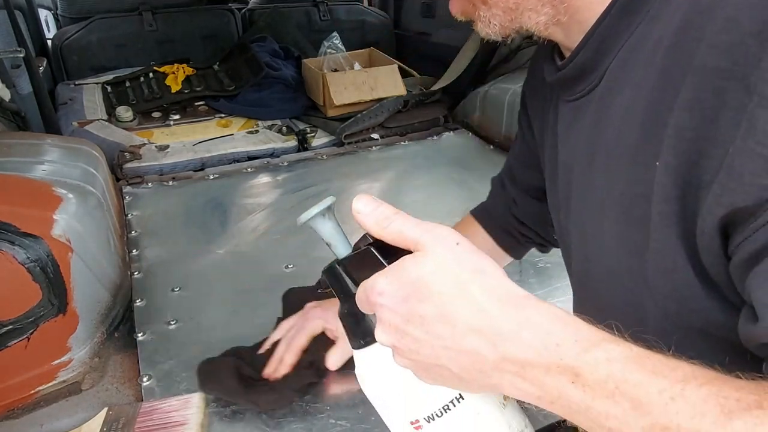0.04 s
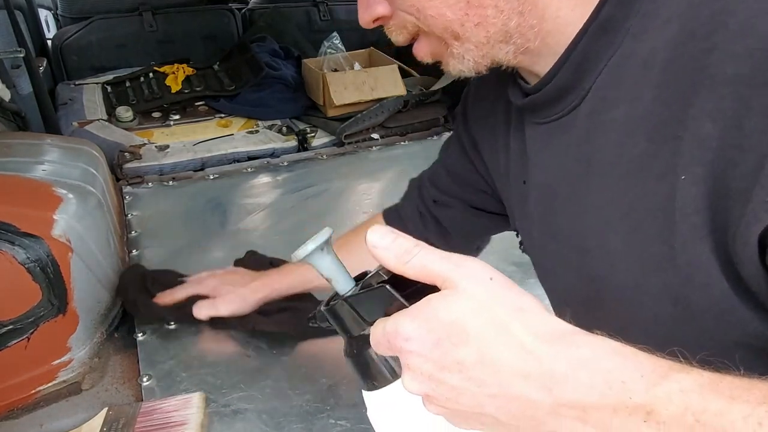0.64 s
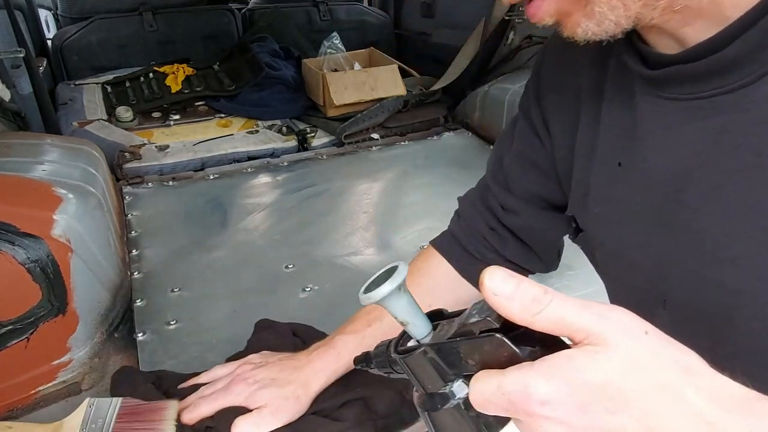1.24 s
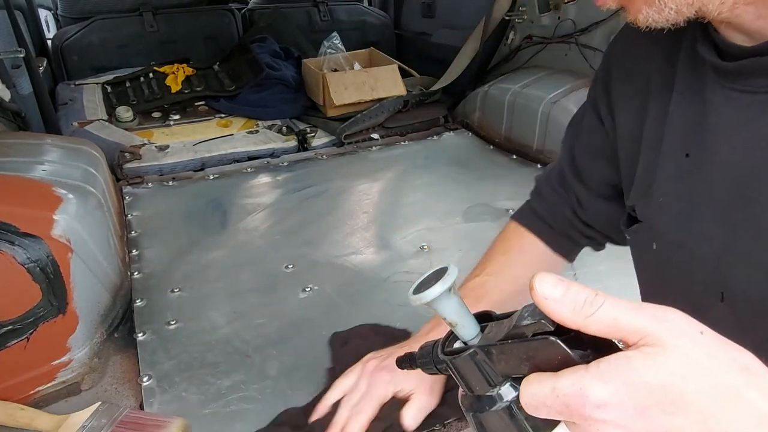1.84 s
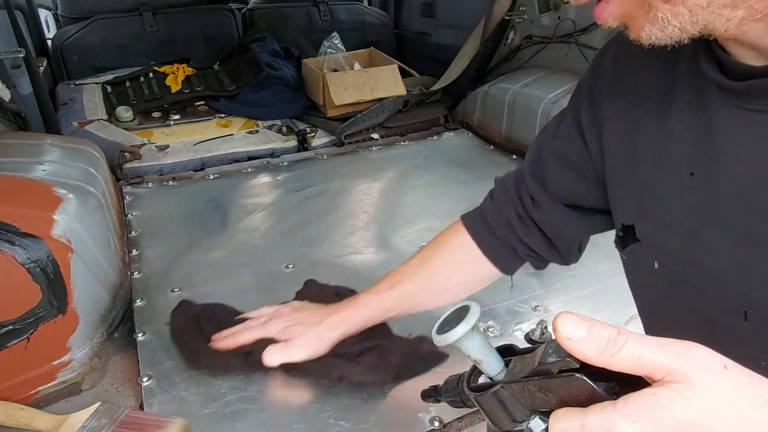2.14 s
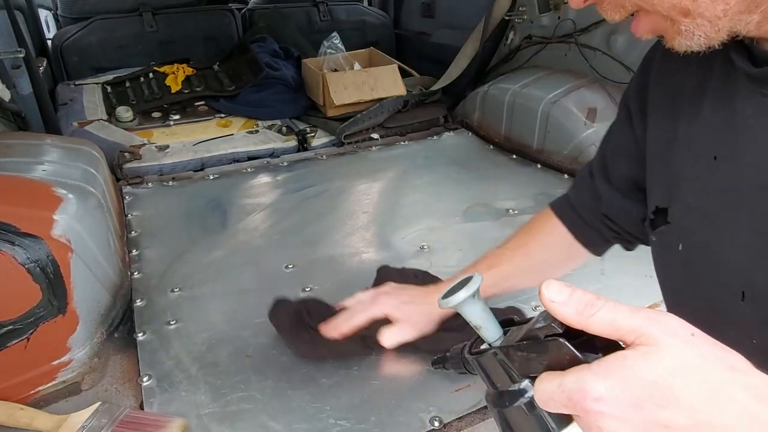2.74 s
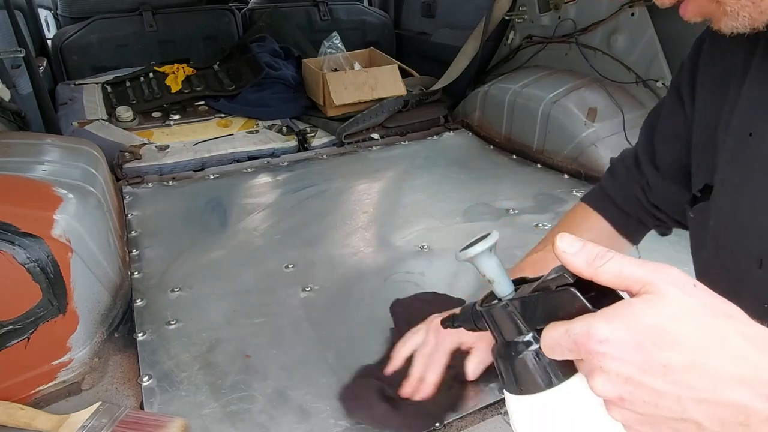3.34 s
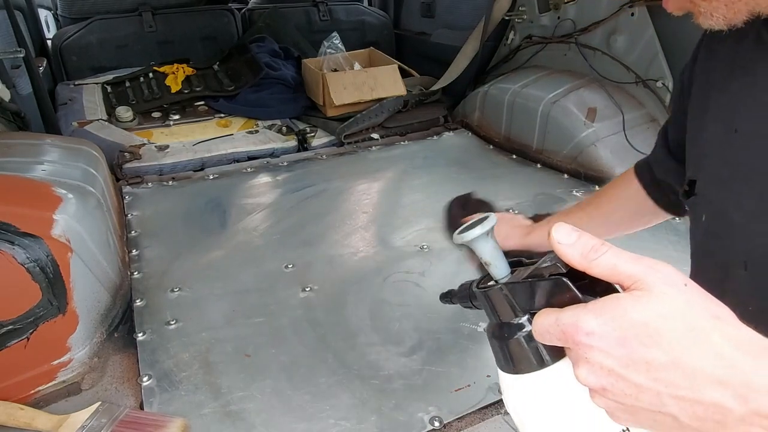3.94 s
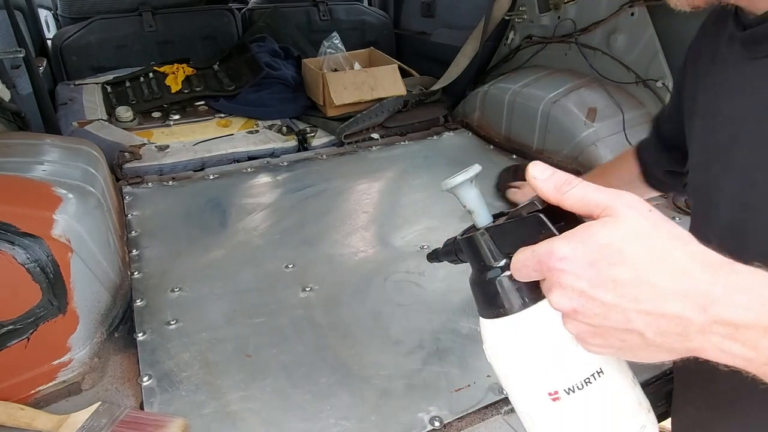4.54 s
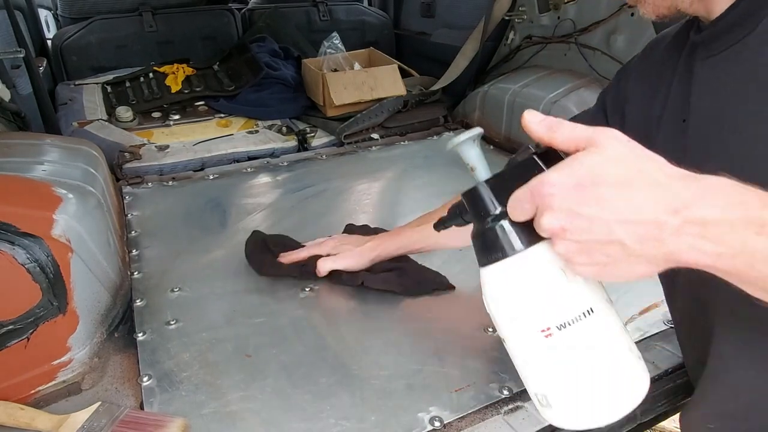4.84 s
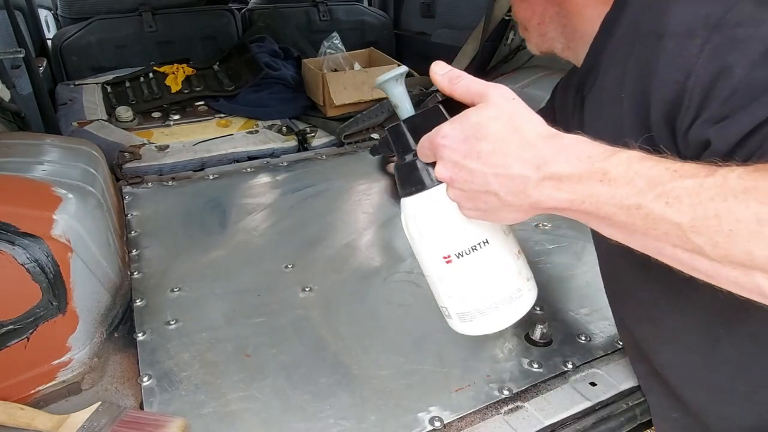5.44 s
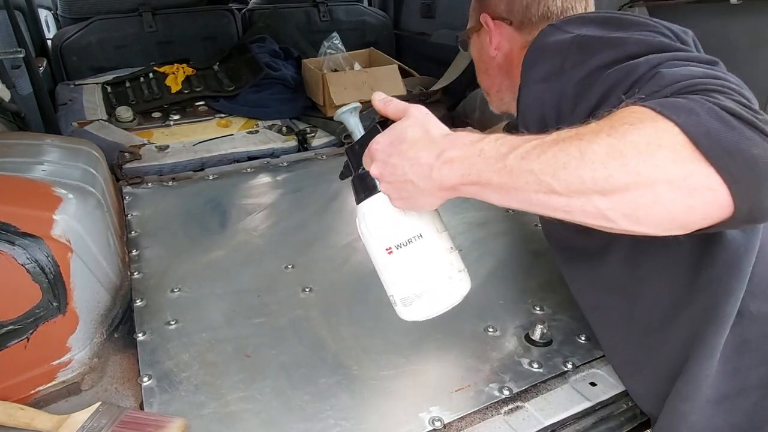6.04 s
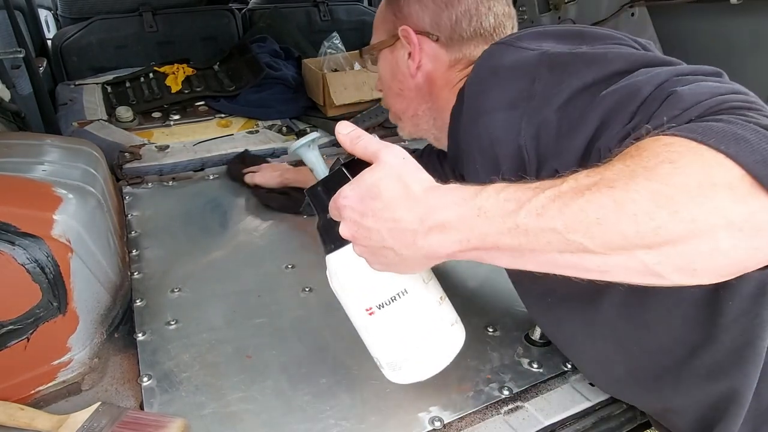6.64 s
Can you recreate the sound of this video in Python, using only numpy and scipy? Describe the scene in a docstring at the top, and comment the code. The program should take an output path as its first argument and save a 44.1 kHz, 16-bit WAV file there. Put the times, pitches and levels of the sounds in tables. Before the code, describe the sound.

Close up in a quiet workshop, quick, uneven cloth strokes swish across a metal sheet inside a car body. Early on come a few plastic clicks from a handled bottle and a brief bright rustle, followed by a cluster of ringing knocks as the sheet hits the floor below. The rubbing continues with low flexing thumps, joined later by sleeve rustles and light bottle ticks.

```python
"""A cloth wipes to and fro over a loose sheet-metal floor panel inside a stripped car body.
Its fibres hiss and scrub; the sheet rumbles, flexes under the hand and a few times knocks on the
floor below. The plastic pump bottle in the other hand ticks, with a brief bright rustle around the
early ticks. Later a sleeve rustles as the arm reaches out. Quiet workshop air lies underneath."""
import sys
import numpy as np
from scipy import signal
from scipy.fft import rfft, irfft, next_fast_len
from scipy.io import wavfile
from scipy.ndimage import uniform_filter1d

SR = 44100
rng = np.random.default_rng(int(sys.argv[2]) if len(sys.argv) > 2 else 0)


def generate_wav(sig):
    """Save sig (samples, or channels by samples) to the path in sys.argv[1] as 16-bit PCM at SR."""
    pcm = np.round(np.clip(np.atleast_2d(sig).T, -1, 1) * 32767).astype(np.int16)
    wavfile.write(sys.argv[1], SR, pcm)


N = 295014
T = np.arange(N) / SR
RING_SAMPLES = 20480
RING_T = np.arange(RING_SAMPLES) / SR


def undb(db):
    """Decibels to gain."""
    return 10 ** (np.asarray(db) / 20)


def unit(x):
    """Scale to rms 1."""
    return x / np.sqrt(np.mean(x ** 2))


def lookup(table, hz):
    """Read (freq_hz, value) points on a log-frequency axis."""
    freq_hz, value = np.transpose(table)
    return np.interp(np.log(hz + 1), np.log(freq_hz + 1), value)


def eq(x, curve):
    """Filter by (freq_hz, gain_db) points."""
    size = next_fast_len(x.shape[-1])
    gain = undb(lookup(curve, np.fft.rfftfreq(size, 1 / SR)))
    return irfft(rfft(x, size) * gain, size)[..., :x.shape[-1]]


def wander(rate_hz):
    """Smooth random modulation with rms 1."""
    size = max(int(SR / rate_hz), 1)
    steps = np.repeat(rng.standard_normal(N // size + 1), size)[:N]
    return unit(uniform_filter1d(uniform_filter1d(steps, size), size))


def add(out, start_s, sound):
    """Mix a stereo sound in at start_s."""
    i = max(int(start_s * SR), 0)
    out[:, i:i + sound.shape[1]] += sound[:, :max(N - i, 0)]


# Stereo width: freq_hz, side_minus_mid_db
STEREO_WIDTH = [(60, -2.5), (200, -9), (380, -10.5), (700, -5), (1300, -0.5), (2400, -2.5), (4400, 0.5),
                (15000, 0)]
# Stereo balance: freq_hz, left_minus_right_db
STEREO_BALANCE = [(100, 1.5), (1000, 1), (2400, 1), (4400, -0.5), (6500, -1.5), (8100, -4), (9500, 6),
                  (12000, 5), (15000, -1.5)]

def spread(pair):
    """Two unrelated noises to left and right: narrow in the low mids, wide in the treble."""
    mid, side = pair[0], eq(pair[1], STEREO_WIDTH)
    left = eq(mid + side, [(hz, db / 2) for hz, db in STEREO_BALANCE])
    right = eq(mid - side, [(hz, -db / 2) for hz, db in STEREO_BALANCE])
    return np.array([left, right])


def modes(table, scatter_db, lag_ms, wide_hz=1500):
    """Fading tones, weighted anew at each spot; the right ear lags, and highs arrive from all sides."""
    hz, db, t60 = np.transpose(table)[:, :, None]
    weight, phase, stray = rng.standard_normal((3, len(hz), 1))
    decay = np.log(1000) * RING_T / t60
    tones = undb(db + scatter_db * weight) * np.exp(2j * np.pi * (hz * RING_T + phase) - decay)
    right_phase = 2 * np.pi * hz * lag_ms / 1000 + stray * hz / wide_hz
    return np.array([tones.real.sum(0), (tones * np.exp(-1j * right_phase)).real.sum(0)])


def strike(ring, contact_ms, low_cut_hz, rise=6):
    """A longer contact gives a duller blow with a slower attack; the first 25 ms get rms 1."""
    contact_samples = SR * contact_ms / 1000
    attack = 1 - np.exp(-np.arange(RING_SAMPLES) / (contact_samples * rise))
    pole = np.exp(-1 / contact_samples)
    dulled = signal.lfilter([1], np.poly([pole, pole]), ring * attack)
    struck = signal.sosfilt(signal.butter(4, low_cut_hz, "high", fs=SR, output="sos"), dulled)
    return struck / np.sqrt(np.mean(struck[:, :1100] ** 2))


def fibres(curve, grain_db):
    """Countless tiny slips of cloth fibres, of uneven size."""
    slips = undb(grain_db * np.repeat(rng.standard_normal(N // 16 + 1), 16)[:N])
    return unit(eq(spread(rng.standard_normal((2, N)) * slips), curve))


# Bright hiss of the fibres: freq_hz, gain_db
HISS_EQ = [(1500, 3.5), (3500, -1), (5000, -3.5), (6500, -4), (8000, 2), (9000, -2), (10200, 0), (12000, 0),
           (13500, -2.5), (15800, -6.5)]
# Darker scrub of the pressed cloth: freq_hz, gain_db
SCRUB_EQ = [(150, 0), (350, 5), (600, 5), (900, 4.5), (1400, 0), (1900, 1.5), (2600, -4.5), (4500, -7.5),
            (7000, -8.5), (15000, -49)]
# Strokes, each lasting until the next. Some open with a brief dip, one just after the loudest knock.
# start_s, fastest_s, dip_s, hiss_db, scrub_db, rumble_db
CLOTH_STROKES = [(-0.2, 0.027, 0, -51, -53.5, -49), (0.15, 0.352, 0.005, -55, -54.5, -52),
                 (0.482, 0.696, 0, -49, -58, -52.5), (0.73, 0.97, 0, -48.5, -46, -46.5),
                 (1.029, 1.117, 0.019, -51, -44, -46), (1.289, 1.43, 0.039, -50.5, -47, -45.5),
                 (1.5, 1.613, .012, -51.5, -52.5, -49), (1.712, 1.804, 0.021, -51.5, -52.5, -45),
                 (1.953, 2.052, 0, -53, -51, -56), (2.144, 2.272, 0, -50.5, -48, -58.5),
                 (2.373, 2.527, 0.0072, -51.5, -51.5, -59), (2.65, 2.808, 0.018, -50.5, -50, -57),
                 (2.907, 3.02, 0.0013, -49, -57, -49.5), (3.113, 3.327, 0.011, -50, -49.5, -56.5),
                 (3.407, 3.676, 0.012, -51.5, -52.5, -52.5), (3.848, 4.036, 0.031, -51, -50.5, -52.5),
                 (4.184, 4.278, 0.0033, -55, -53.5, -54), (4.43, 4.87, 0.0054, -51.5, -59.5, -56.5),
                 (4.922, 4.987, 0.014, -52.5, -52.5, -58.5), (5.13, 5.2, 0, -52.5, -68, -59.5),
                 (5.329, 5.563, .01, -54.5, -67, -64.5), (5.685, 5.77, 0.006, -53.5, -63, -50.5),
                 (5.86, 5.956, 0, -52.5, -50, -52), (6.138, 6.21, .025, -53, -55.5, -60),
                 (6.297, 6.636, 0, -55, -60.5, -60)]

def cloth(hiss_trim_db=4.5, scrub_trim_db=2, rumble_trim_db=-1, flutter_db=1.32, judder_db=0.8):
    """Speed makes the fibres hiss; weight makes them scrub and sets the sheet rumbling."""
    hiss_db, scrub_db, rumble_db = np.transpose(CLOTH_STROKES)[3:]
    hiss = fibres(HISS_EQ, grain_db=1) * wiping(hiss_db, turn_db=-3.5, swell=2.04)
    hiss *= undb(hiss_trim_db + flutter_db * wander(45))
    scrub = fibres(SCRUB_EQ, grain_db=2.5)
    scrub *= wiping(scrub_db + scrub_trim_db, turn_db=-7, swell=2.5, dip=0.36)
    rumble = sheet_rumble() * wiping(rumble_db + rumble_trim_db, turn_db=-2, swell=1.06, dip=0.15)
    judder = undb(-judder_db * wander(76))  # the cloth catches and lets go as it slides
    return hiss + judder * (scrub + rumble)


def wiping(level_db, turn_db, swell, dip=1, blend_s=0.045, last_end_s=6.85):
    """Rubbing envelope: each stroke speeds up and slows into a turn; at some the level dips briefly."""
    starts, fastest, dips = np.transpose(CLOTH_STROKES)[:3]
    ends = np.append(starts[1:], last_end_s)
    stroke_db, dip_db = np.zeros((2, N))
    for start_s, fastest_s, end_s, dip_s, peak_db in zip(starts, fastest, ends, dips, level_db):
        now = (T >= start_s) & (T < end_s)
        speed = np.sin(np.pi / 2 * np.interp(T[now], [start_s, fastest_s, end_s], [0, 1, 0]))
        stroke_db[now] = peak_db + turn_db * (1 - speed ** swell)
        if dip_s > 0:
            near = np.abs(T - start_s) < np.pi * dip_s
            depth_db = 401 * dip * dip_s  # longer dips go deeper
            dip_db[near] += depth_db * np.exp(-((T[near] - start_s) / dip_s) ** 2)
    return undb(uniform_filter1d(stroke_db, int(blend_s * SR)) - dip_db)


def sheet_rumble(flex_db=-2):
    """Friction noise keeps the sheet's bending, ring and clatter sounding."""
    flex = unit(strike(sheet_flex(scatter_db=-10, lag_ms=0.24), contact_ms=0.7, low_cut_hz=51.7))
    ring = unit(strike(panel_ring(scatter_db=4, lag_ms=0.12), contact_ms=0.74, low_cut_hz=227))
    wash = unit(strike(clatter(), contact_ms=0.45, low_cut_hz=214))
    response = undb(flex_db) * flex + ring + wash
    friction = rng.standard_normal((1, N))
    return unit(signal.fftconvolve(friction, response, axes=1)[:, :N])


# Low bending modes of the sheet: pitch_hz, level_db, t60_s
FLEX_MODES = [(60, -9, 0.74), (85, -2, 0.13), (111.1, -3, 0.23), (143.7, -1.5, 0.35), (157.3, -9.5, 0.47),
              (186.8, -8, 0.24)]

def sheet_flex(scatter_db, lag_ms, focus_hz=None, octave_off_db=16):
    """The whole sheet bends with a low wobble, strongest near focus_hz if given."""
    hz, db, t60 = np.transpose(FLEX_MODES)
    if focus_hz:
        db = db - octave_off_db * np.log2(hz / focus_hz) ** 2
    return modes(np.c_[hz, db, t60], scatter_db, lag_ms)


# Ringing modes of the panel: pitch_hz, level_db, t60_s
PANEL_MODES = [(233.6, -13, 0.17), (267, -1.5, 0.19), (312.3, 3.5, 0.12), (353.5, -5.5, 0.29),
               (376, -3, 0.23), (429, -3, 0.15), (524, 0, 0.13), (493, -17, 0.32), (573, -1, 0.14),
               (610, -5.5, 0.24), (694.5, -1, 0.12), (802, -1, 0.12), (808, -3.5, 0.069), (900, -2, 0.21),
               (961, -3, 0.035), (1012, -9, 0.1), (1072, -1.5, 0.16), (1198, -4.5, 0.15),
               (1340, -1.5, 0.11), (1380, -33, 0.1), (1633, -9, 0.14), (2070, -4, 0.13), (2080, -18, 0.15),
               (2320, -15, 0.091), (2560, -6, 0.058), (2470, -7, 0.095), (2730, -6, 0.024),
               (2950, -2, 0.05), (3200, -3.5, 0.06), (3500, -4, 0.025)]

def panel_ring(scatter_db, lag_ms):
    """The panel's strong modes give a short metallic ring."""
    return modes(PANEL_MODES, scatter_db, lag_ms)


# Tone of the crowd of weak modes: freq_hz, gain_db
CLATTER_EQ = [(60, -20), (150, -17), (270, -13), (400, -0.5), (500, -8), (650, 1.5), (950, -1), (1300, -10),
              (1650, -14.5), (2600, -13), (3500, -16), (5500, -20.5), (9000, -17), (15000, -60)]
# Their decay by band: freq_hz, t60_s
CLATTER_DECAY = [(150, 0.37), (300, 0.34), (700, 0.15), (1400, 0.21), (2800, 0.15), (6000, 0.15),
                 (14000, 0.024)]

def clatter():
    """Dense weak modes and echoes of the car body; the treble dies first."""
    spectrum = rfft(eq(spread(rng.standard_normal((2, RING_SAMPLES))), CLATTER_EQ))
    hz, t60 = np.transpose(CLATTER_DECAY)
    bins_hz = np.fft.rfftfreq(RING_SAMPLES, 1 / SR)
    bands = [irfft(spectrum * lookup(np.c_[hz, pick], bins_hz)) for pick in np.eye(len(hz))]
    return sum(band * np.exp(-np.log(1000) * RING_T / t60_s) for band, t60_s in zip(bands, t60))


# Room tone: freq_hz, gain_db
WORKSHOP_EQ = [(25, 17), (60, -7), (150, 8.5), (400, -15), (1500, 0.5), (3500, -1), (8000, -9),
               (15800, -43)]

def workshop(level_db=-60):
    """Quiet, even air of the workshop."""
    return undb(level_db) * unit(eq(spread(rng.standard_normal((2, N))), WORKSHOP_EQ))


# Soft bumps, as the sheet gives under the hand or, from 1.710 to 1.902 s, bounces back on the floor after the
# loudest knock: start_s, ring_db, flex_db
SOFT_BUMPS = [(0.325, -43.5, -45.5), (0.674, -46, -44.5), (0.738, -41, -35), (0.871, -51, -60),
              (.934, -27, -31.5), (0.976, -35.5, -58), (1.057, -36.5, -61), (1.087, -30.5, -34.5),
              (1.407, -40.5, -50), (1.710, -25.5, -54), (1.806, -31, -40.5), (1.844, -41.5, -51),
              (1.902, -39.5, -51), (2.337, -43.5, -72), (2.384, -41, -56), (2.719, -43, -44),
              (2.742, -39.5, -42.5), (3.098, -51.5, -34), (3.704, -43, -50), (3.729, -39, -40),
              (3.772, -44, -46), (3.928, -38.5, -43), (3.952, -42, -48), (4.036, -49, -38.5),
              (4.41, -51.5, -53.5), (4.643, -47.5, -41.5), (4.873, -56.5, -44.5), (4.96, -63, -49.5),
              (5.80, -52, -52), (5.899, -46, -53), (6, -50, -44), (6.286, -43.5, -47.5),
              (6.548, -65, -52.5)]
# Hard knocks on the floor below: start_s, ring_db, contact_ms
HARD_KNOCKS = [(0.94, -30, 0.043), (1.131, -22, 0.042), (1.142, -23, 0.31), (1.354, -29, 0.16),
               (1.373, -32.5, 0.21), (1.670, -14, 0.028)]
# A stronger blow favours higher bending modes: ring_db, focus_hz
FLEX_FOCUS = [(-56.5, 72), (-55, 89.5), (-35, 94), (-28.5, 196), (0, 290)]

def bumps_and_knocks(bump_contact_ms=0.98, knock_flex_drop_db=20, crack_db=-1, crack_ms=1.8):
    """The hand bends the sheet, which bumps softly or drops on the floor below and rings."""
    out = np.zeros((2, N))
    hard = [(start_s, db, db - knock_flex_drop_db, ms) for start_s, db, ms in HARD_KNOCKS]
    soft = [(*bump, bump_contact_ms) for bump in SOFT_BUMPS]
    for start_s, ring_db, flex_db, contact_ms in hard + soft:
        ring = panel_ring(scatter_db=5.5 * contact_ms - 3.44, lag_ms=0.27)
        ring = strike(ring, contact_ms=0.027, low_cut_hz=105)
        # soft blows leave the sheet ringing with little clatter
        wash = undb(-4 - 5 * contact_ms) * strike(clatter(), contact_ms=0.021, low_cut_hz=97)
        crack = undb(crack_db) * rng.standard_normal(ring.shape) * np.exp(-1000 * RING_T / crack_ms)
        hit = strike(ring + wash + crack, contact_ms, low_cut_hz=216, rise=6.3)
        focus_hz = np.interp(ring_db, *np.transpose(FLEX_FOCUS))
        flex = sheet_flex(scatter_db=0.5, lag_ms=0.32, focus_hz=focus_hz)
        thump = strike(flex, contact_ms=0.48, low_cut_hz=0.26 * focus_hz, rise=12)
        add(out, start_s, undb(ring_db) * hit + undb(flex_db) * thump)
    return out


# Handling ticks of the pump bottle: start_s, peak_db, pitch_hz
BOTTLE_TICKS = [(.420, -36, 2490), (0.5104, -33, 1520), (0.516, -33, 1430), (0.7126, -26, 3300),
                (0.7617, -24, 3040), (4.83, -38, 2180), (4.9728, -40, 1760), (5.1395, -38, 1800),
                (5.192, -38, 1380), (5.307, -31.5, 2020), (5.6661, -33.5, 3280), (5.928, -35, 1660),
                (5.942, -28.5, 1210)]

def bottle(echo_db=-22, echo_ms=8, body_q=0.85, size=4096):
    """A short snap of plastic, then its scattered echo off the panel."""
    out = np.zeros((2, N))
    ms = 1000 * np.arange(size) / SR
    for start_s, peak_db, pitch_hz in BOTTLE_TICKS:
        echo = undb(echo_db) * rng.standard_normal((2, size)) * np.exp(-ms / echo_ms)
        snap = signal.unit_impulse(size) + echo
        body = signal.iirpeak(pitch_hz, body_q, fs=SR)
        tick = signal.lfilter(*body, signal.lfilter(*body, snap))
        add(out, start_s, undb(peak_db) * tick / np.abs(tick.mean(0)).max())
    return out


# Tone of the rustles: freq_hz, gain_db
RUSTLE_EQ = [(300, -21), (900, -17), (1300, -3), (1600, 3.5), (2100, 2.5), (2600, -2), (4200, -11),
             (7000, -27), (15000, -38)]
# A brief bright rustle around the early ticks, then the later slides of the sleeve:
# middle_s, half_length_s, level_db, tilt_db_per_octave
RUSTLE_SWELLS = [(0.794, 0.092, -49.5, 5), (4.985, 0.026, -46, -5), (5.05, 0.028, -51, -4),
                 (5.415, 0.14, -55.5, -2), (5.703, 0.028, -45.5, 7), (5.768, 0.027, -44.5, 3.5),
                 (5.953, 0.067, -46.5, 0.5), (6.208, 0.03, -45.5, -0.5)]

def rustles(crumple_db=2.5, size=32768):
    """Coarse grains swell and fade; in the later swells, heavy sleeve folds slide over each other."""
    out = np.zeros((2, N))
    grains = fibres(RUSTLE_EQ, grain_db=0.5) * undb(crumple_db * wander(70))
    for middle_s, half_length_s, level_db, tilt in RUSTLE_SWELLS:
        first = int(middle_s * SR) - size // 2
        span = slice(first, first + size)
        rustle = unit(eq(grains[:, span], [(hz, tilt * np.log2(hz)) for hz in (500, 5000)]))
        swell = np.exp(-((T[span] - middle_s) / half_length_s) ** 2)
        add(out, first / SR, undb(level_db) * rustle * swell)
    return out


def scene():
    """Panel, cloth, rustles and bottle, all within arm's reach, over the room tone."""
    return bumps_and_knocks() + cloth() + rustles() + bottle() + workshop()


def record(dry, low_cut_hz=30, high_cut_hz=15800):
    """A gentle low cut thins the deepest bass; a steep high cut takes off the top."""
    thinned = signal.sosfilt(signal.butter(2, low_cut_hz, "high", fs=SR, output="sos"), dry)
    return signal.sosfilt(signal.ellip(10, 0.2, 80, high_cut_hz, fs=SR, output="sos"), thinned)


dry = scene()
out = record(dry)
generate_wav(out)
```